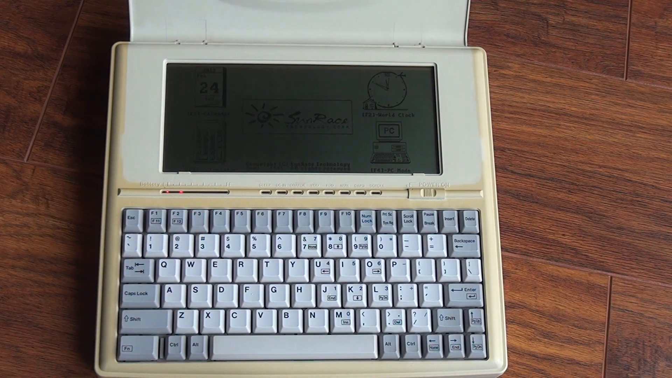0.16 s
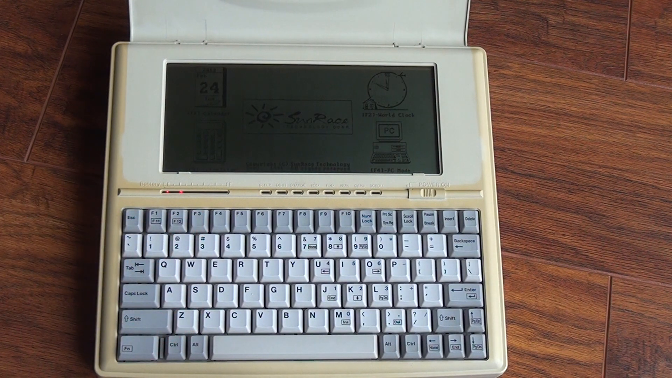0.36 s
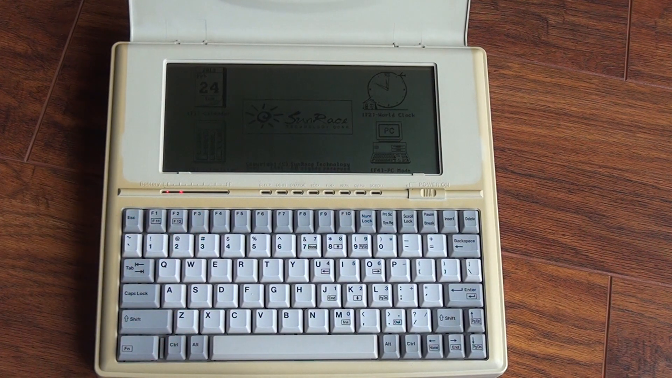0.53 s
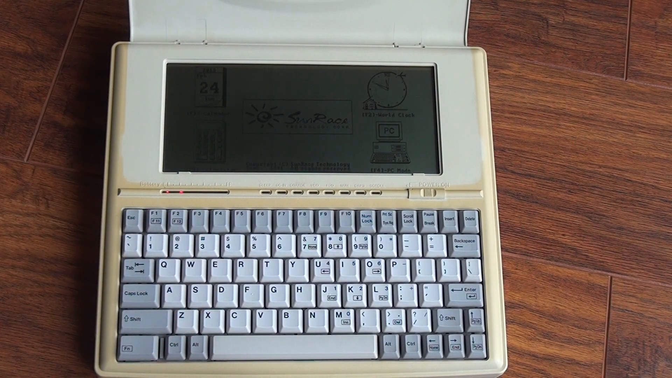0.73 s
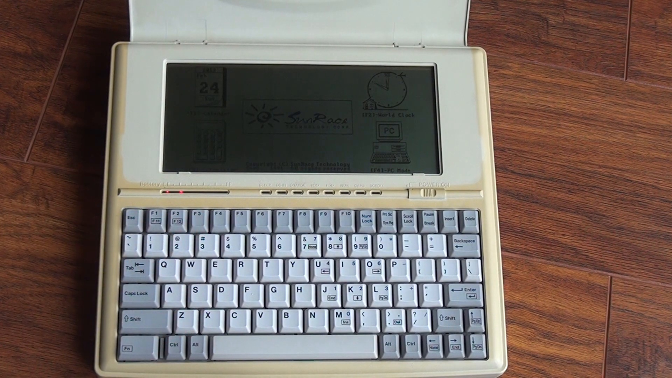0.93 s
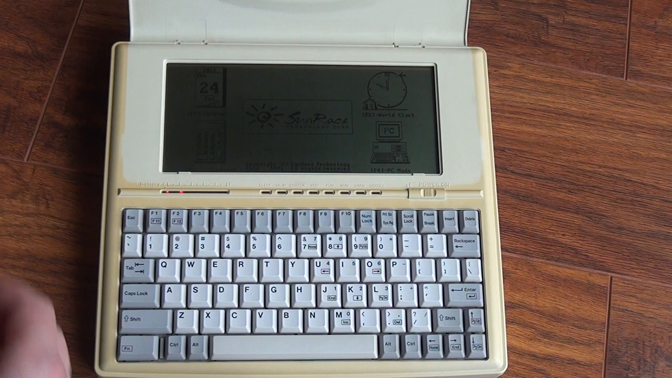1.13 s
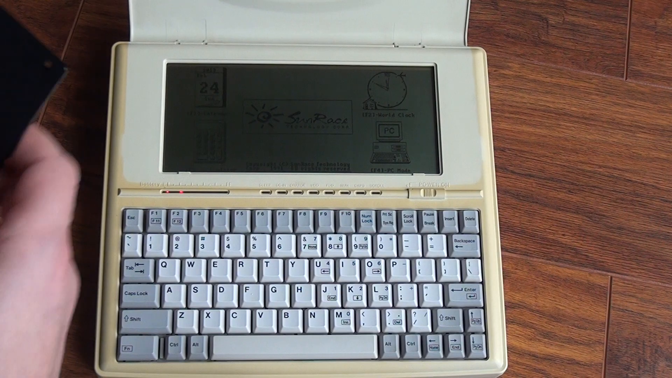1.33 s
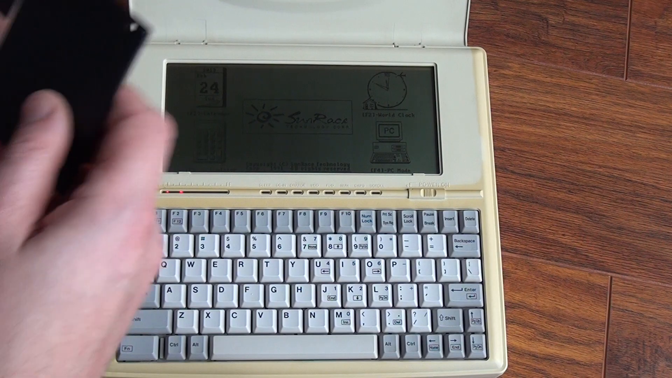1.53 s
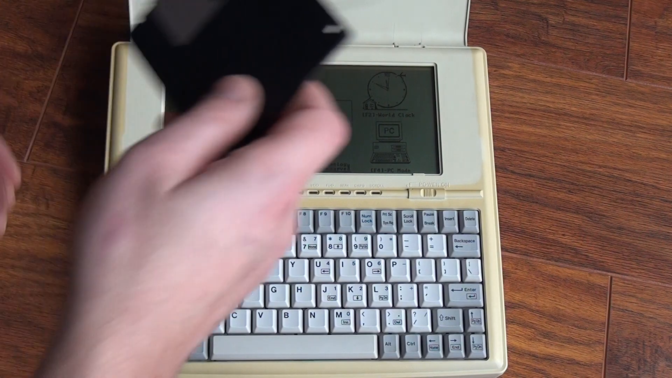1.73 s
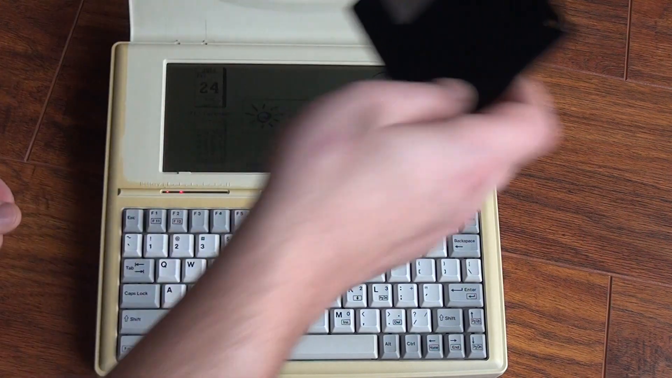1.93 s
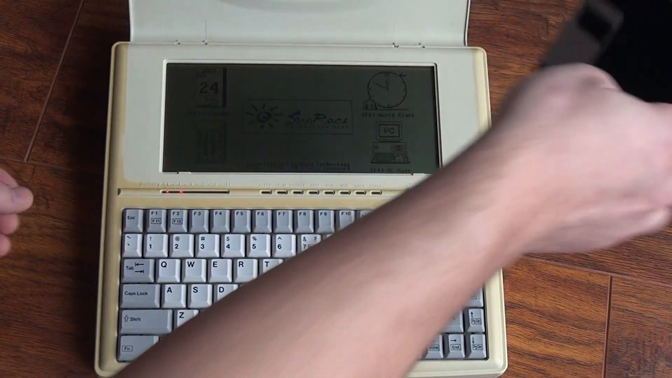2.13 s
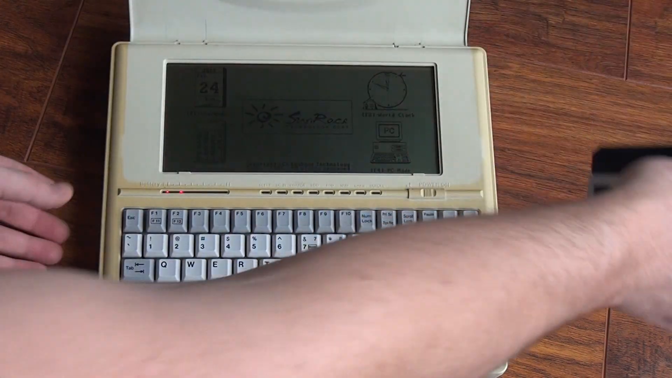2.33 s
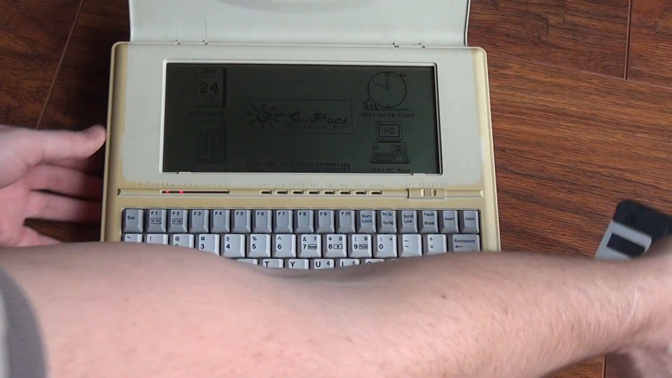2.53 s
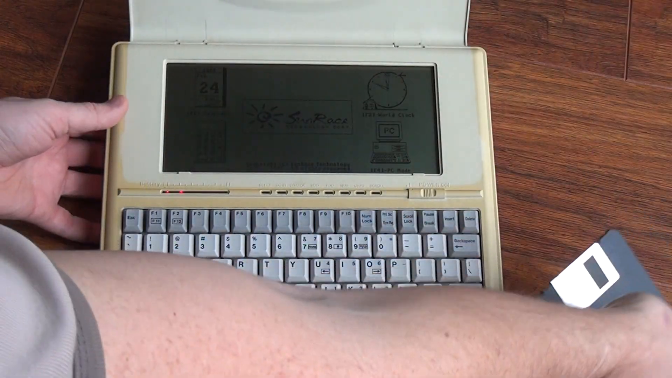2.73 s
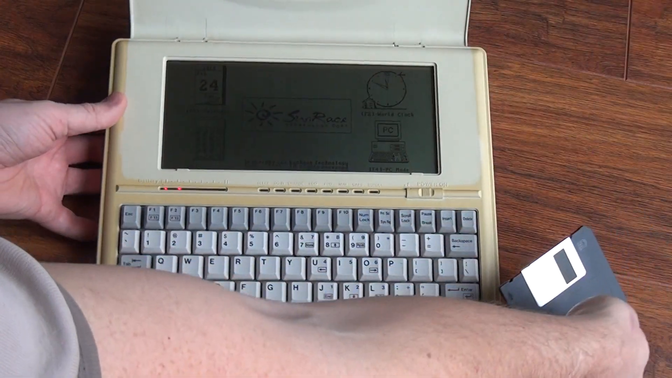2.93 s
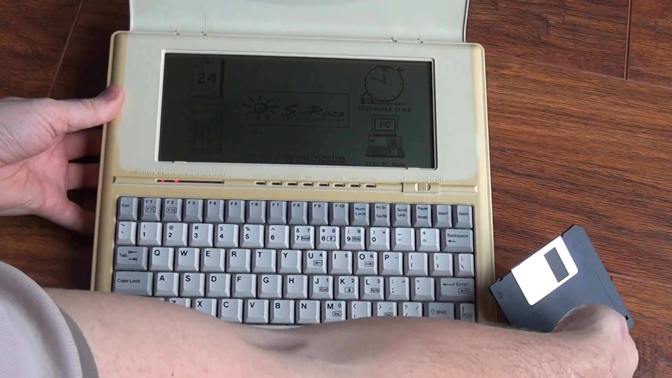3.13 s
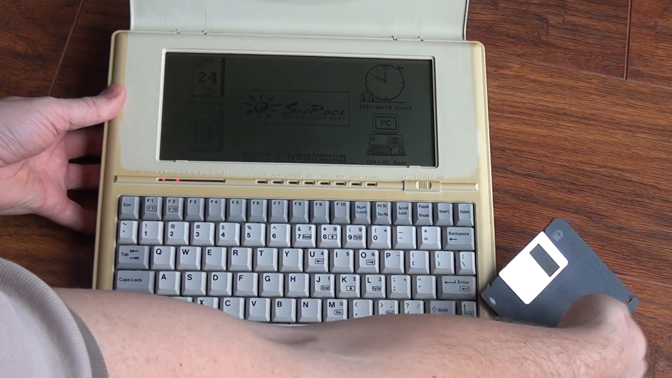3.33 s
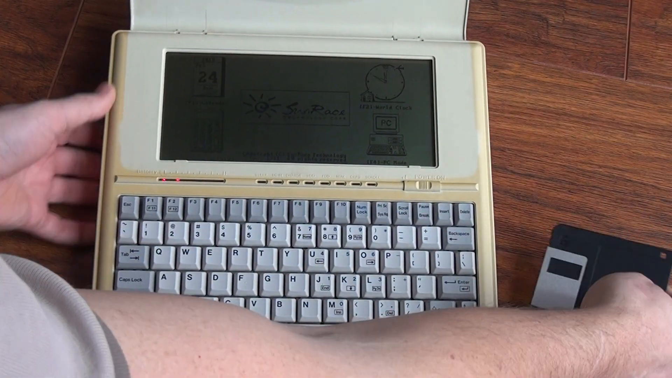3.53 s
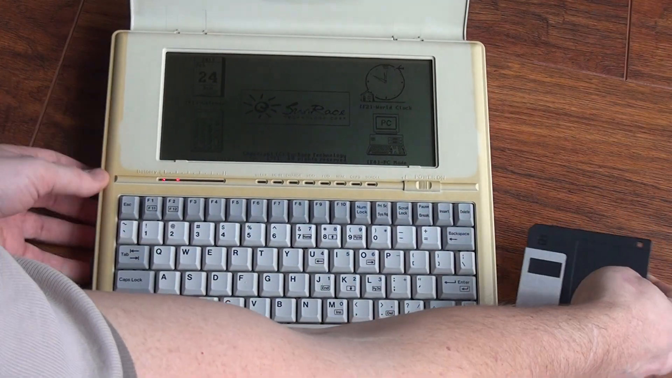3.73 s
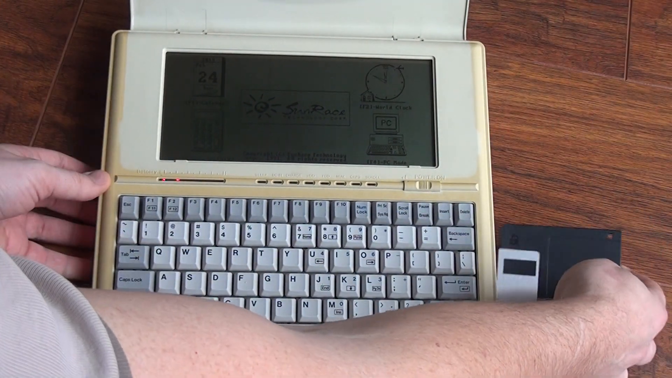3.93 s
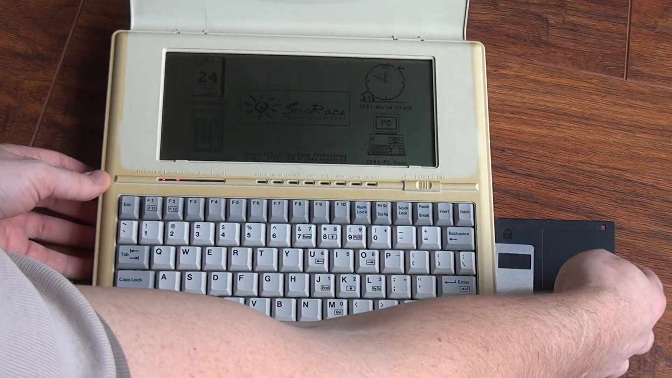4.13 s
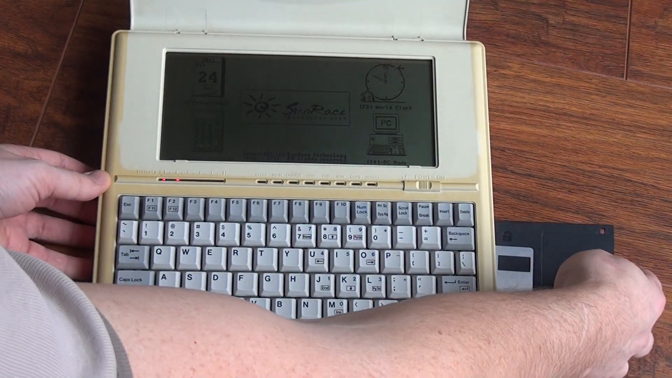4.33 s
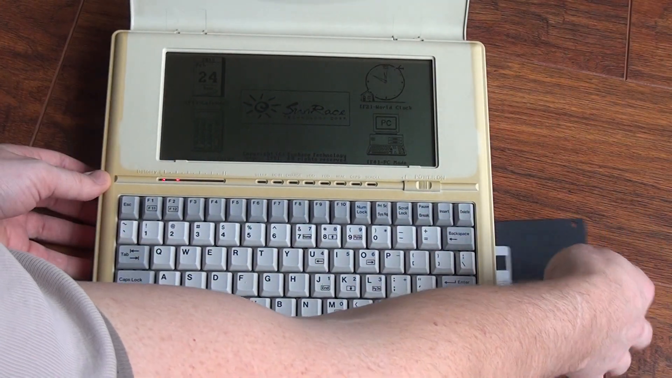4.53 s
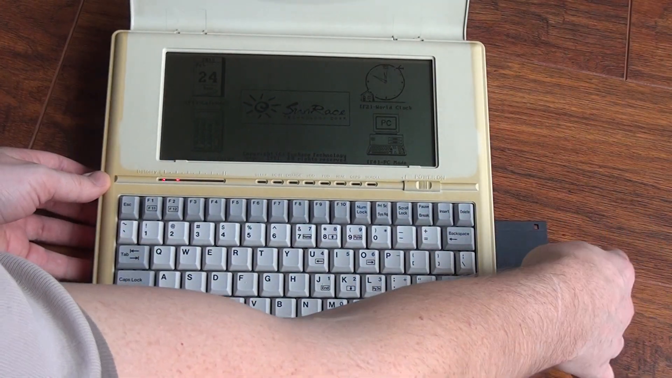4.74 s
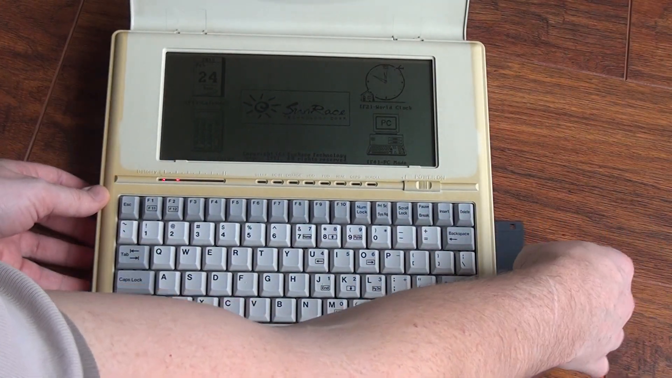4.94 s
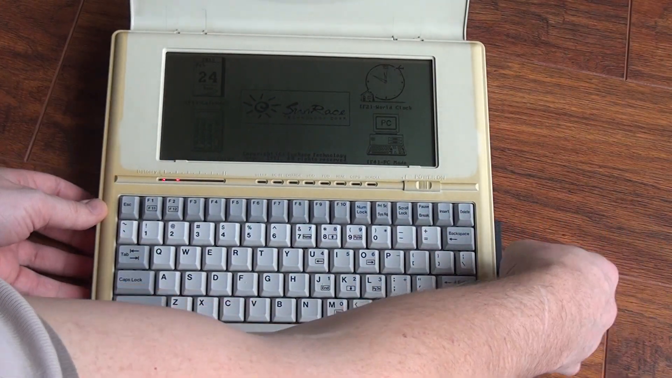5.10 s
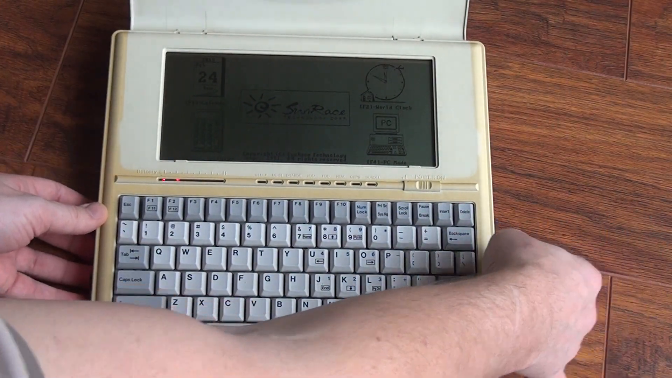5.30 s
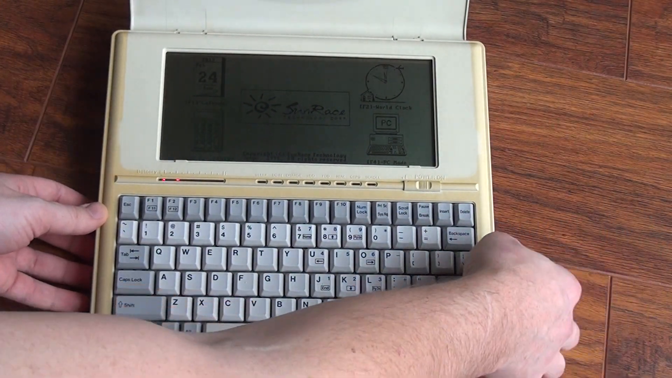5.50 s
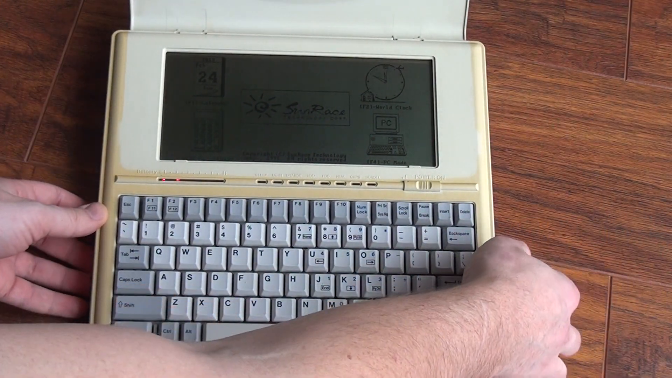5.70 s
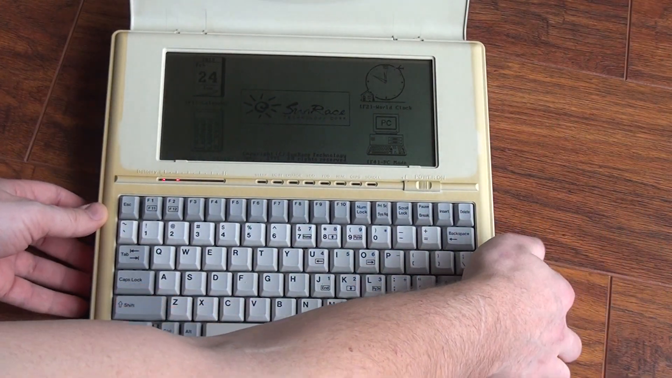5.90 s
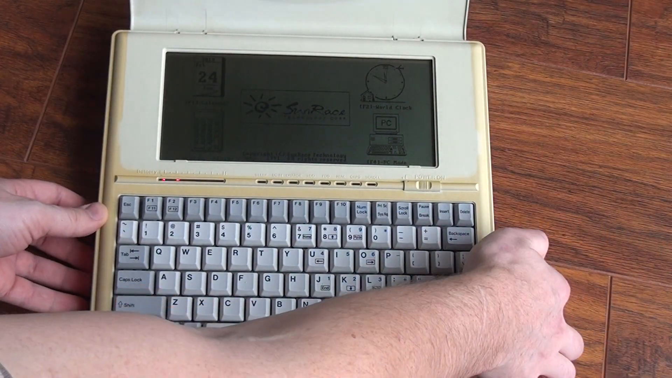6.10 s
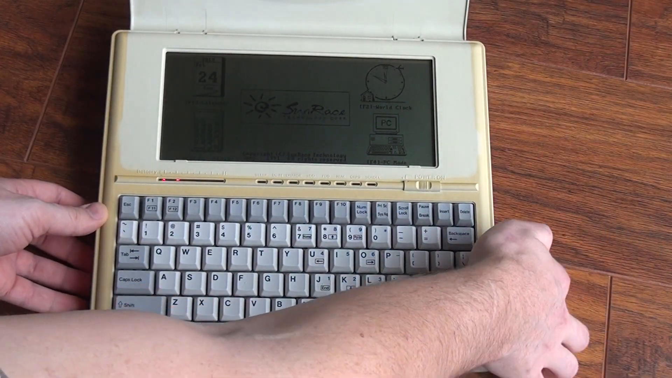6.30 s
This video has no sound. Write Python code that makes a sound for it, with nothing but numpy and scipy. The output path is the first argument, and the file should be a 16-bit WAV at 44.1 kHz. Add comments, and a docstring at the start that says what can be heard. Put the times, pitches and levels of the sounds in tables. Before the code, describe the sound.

In a quiet small room, heard from close by, a hand drags a floppy disk off the floor and turns it with soft plastic ticks while a sleeve rustles faintly. The clicks and scuffs grow busier as the disk is fed into a laptop drive. After a brief lull it locks in with a louder clack and a soft low thud, and one more click follows.

```python
"""Loading a floppy disk

A hand drags a floppy disk off a wooden floor, handles it, taps it against a laptop's drive slot and
pushes it in; the drive latches with a clack. Impact and friction excite the resonant modes of the
plastic, and the floor boards thud softly. A sleeve rustles over room air and faint electric tones.
The small, hard room reverberates after each knock."""
import sys
import numpy as np
from scipy import signal
from scipy.fft import rfft, irfft, next_fast_len
from scipy.io import wavfile
from scipy.ndimage import uniform_filter1d, map_coordinates

SR = 44100
rng = np.random.default_rng(int(sys.argv[2]) if len(sys.argv) > 2 else 0)


def file_out(sig):
    """Save sig as 16-bit WAV at sys.argv[1]."""
    # one column per channel
    cols = np.atleast_2d(sig).T
    # limit, then scale
    lim = np.clip(cols, -1, 1)
    pcm = np.round(lim * 32767).astype(np.int16)
    wavfile.write(sys.argv[1], SR, pcm)


N = 284886

# Modes of the five plastic parts, dull to bright: centre_hz, bandwidth_hz, gain_db
CASE_MODES = [(405, 110, -10.5), (537, 78, 2), (769, 197, -0.5), (950, 125, 2), (1174, 80, 0)]
SHELL_MODES = [(1300, 280, 0.5), (1740, 253, 2.5), (2133, 178, 2), (2500, 177, -3)]
EDGE_MODES = [(2850, 660, 0.5), (3310, 130, 5.5), (3500, 490, -1.5)]
SHUTTER_MODES = [(5480, 1900, 2.5), (6310, 1670, 4.5), (8860, 2300, -9.5)]
HISS_MODES = [(10800, 2200, 0), (13600, 710, 3), (15300, 2900, -9.5)]
# How readily each part sounds: gain_db. A touch's hardness favours one, from 0 (case) to 4 (hiss).
PART_DB = [0.53, -0.81, -1.05, -0.0033, 1]
# Transmission into the laptop case, weak in the air and strong in the slot: time_s, gain_db
CASE_COUPLING = [(0.5, -7), (2.2, -8), (2.6, 2.5), (4.45, 0), (4.7, -2.5), (5.05, 0.5), (5.15, 2), (6.3, 1),
                 (6.37, -7.5)]
# Knocks, ticks and scrapes: start_s, rise_s, t60_s, level_db, hardness, pitch_hz, ring_over_rattle_db
IMPACTS = [(0.555, 0.00092, 0.041, -66, 1.5, 3160, 10.5), (0.688, 0.014, 0.16, -64.5, -0.5, 3500, 12),
           (0.7212, 0.00056, 0.019, -51, 0, 3290, 7), (0.941, .001, .031, -68.5, 2.5, 2380, 6.5),
           (0.953, 0.0011, 0.032, -66, 2, 2050, 2), (1.041, 0.0011, .02, -79, 5, 5600, -10),
           (1.367, 0.00074, 0.026, -67.5, 4, 2860, 14.5), (1.374, 0.0025, 0.019, -54, 2, 2050, -22),
           (1.384, 0.031, 0.46, -73.5, 2, 3970, 8), (1.465, 0.0026, 0.02, -55.5, 3.5, 2650, 6),
           (1.475, .001, 0.013, -72, 7, 6500, 3), (1.589, 0.0022, .025, -56, 3, 1920, 8.5),
           (1.634, 0.0047, 0.035, -63.5, 2.5, 1740, -1), (2.002, 0.0022, 0.046, -59.5, 2.5, 3180, -8),
           (2.441, 0.0022, 0.044, -62, -0.5, 260, 2), (2.677, 0.00091, 0.024, -65, 1.5, 3220, -15),
           (2.52, 0.0019, 0.023, -70, -2, 328, 8), (2.702, 0.0018, 0.025, -66, -1.5, 480, 9.5),
           (2.782, 0.001, 0.014, -57.5, 2.5, 445, 12), (2.92, 0.00092, 0.086, -60, -0.4, 410, -3),
           (3.09, .0027, 0.028, -61, -2, 730, 5), (3.134, 0.0011, 0.019, -47, 0, 568, 1),
           (3.376, 0.0099, 0.08, -71.5, 1.3, 980, 3.5), (3.663, 0.0028, 0.033, -68.5, -2, 1116, 7.5),
           (3.757, 0.00068, 0.013, -65.5, 1.7, 1920, 12.5), (3.915, 0.0018, 0.04, -48.5, 0.1, 940, 8),
           (3.917, 0.003, 0.023, -56, 0.5, 3540, 12.5), (3.95, .0034, 0.18, -72, -0.5, 3755, 11),
           (4.05, 0.024, 0.35, -62.5, 0.64, 912, -12), (4.095, 0.00072, 0.065, -46, 1.95, 943, -5),
           (4.109, 0.0023, 0.08, -46.5, 1, 2010, -16), (4.269, 0.00073, 0.039, -46.5, 0.5, 820, 3.5),
           (4.4, 0.001, 0.084, -51.5, 0.37, 773, -1), (4.424, 0.002, 0.085, -56, 0.75, 2100, -10),
           (4.523, 0.0039, 0.1, -47.5, 0.6, 2076, 2), (4.571, 0.0025, 0.13, -50, 1.57, 685, -1),
           (4.602, .0033, 0.068, -39, -0.36, 953, -3.5), (4.66, 0.024, 0.15, -55.5, 0.7, 573, 4.5),
           (4.744, 0.0044, 0.045, -44, 0, 797, -3), (4.836, .001, .018, -68, 4, 3200, -13),
           (4.858, 0.0071, 0.34, -60, 0.1, 3000, 2.5), (4.87, 0.035, 0.18, -67, 2, 548, 9),
           (4.896, 0.0055, 0.052, -62.5, 2.5, 2066, 8), (4.98, 0.0026, 0.054, -51.5, -0.1, 698, 4),
           (5.004, 0.027, 0.1, -61, 1.6, 566, 7), (5.036, 0.0063, .03, -53, -4, 2030, -1),
           (5.113, 0.0059, 0.01, -39.5, 2.5, 6680, -13.5), (5.117, 0.0063, .11, -47, 1.07, 2108, 4.5),
           (5.119, 0.0029, 0.088, -54, 9, 1602, 6), (5.142, .002, 0.092, -58, -1, 775, -12),
           (5.245, 0.0046, .12, -62, 1.8, 2380, -5), (5.545, 0.0041, 0.045, -58, 1.2, 532, 6),
           (5.6, 0.0042, 0.027, -64.5, -7, 506, -4), (5.919, 0.0076, 0.1, -64, -1.2, 480, 2.5),
           (6.009, 0.0022, 0.031, -43, 0.52, 803, 1), (6.019, 0.0035, 0.029, -52, -0.5, 1555, 7.5),
           (6.153, 0.02, 0.035, -29, 1.34, 1775, -3), (6.158, 0.014, 0.045, -38.5, 4, 474, -6),
           (6.19, 0.01, 0.32, -55, 0, 2484, 14), (6.378, .0006, 0.022, -54, 1.2, 2146, 20),
           (6.392, 0.0035, 0.026, -34, 1.5, 2140, -4.5)]
# The disk sliding on floor, case and slot, then the drive's mechanism settling after the latch, one list per
# stroke: time_s, level_db, hardness
SLIDE_STROKES = [
    [(0.555, -64, 1.9), (0.601, -54.5, 1.9), (0.67, -58, 1.83), (0.74, -58.5, 1.14), (0.8, -70, 1.9),
     (0.9, -88, 3.6)],
    [(2.97, -69.5, 0.92), (3.12, -66.5, 0.99), (3.35, -92, 0.66)],
    [(4.53, -60, -1), (4.624, -61.5, 1.64), (4.734, -58, 0.7), (4.82, -70.5, 0.7), (4.936, -64.5, 1),
     (5.104, -64, 0.86), (5.25, -69, 2.5), (5.33, -80, -4)],
    [(6.22, -70, 2.1), (6.33, -56.5, 1.2), (6.46, -60, 1.4)],
]
# Fingers brushing disk and case: start_s, rise_s, t60_s, level_db, hardness
FINGER_STROKES = [(1.1, 0.052, 0.8, -70, 3), (1.591, 0.011, 0.11, -62.5, 4),
                  (1.83, 0.022, 0.29, -66.5, 2.5), (2.08, 0.045, 0.74, -68, 2),
                  (2.62, .025, 0.24, -66.5, 2.5), (2.812, .0045, 0.085, -62.5, -8),
                  (2.995, 0.024, .26, -65, 0.5), (3.222, .006, 0.074, -63, -1), (3.44, 0.025, 0.43, -71, 2),
                  (3.59, 0.019, 0.51, -68.5, 0.6), (5.859, 0.0098, 0.29, -68.5, 1.05)]
# The disk's travel from left to right: time_s, left_over_right_db
DISK_PATH = [(1.6, 2.5), (2.1, -2), (6.46, -2)]
# Weight settling on the floor boards: start_s, level_db, pitch_hz
FLOOR_THUDS = [(0.714, -78, 205), (1.583, -74.5, 162), (2.442, -77, 243), (3.085, -77, 175),
               (3.137, -76, 148), (4.6, -69, 245), (5.12, -72, 256), (6.16, -50.5, 246), (6.165, -66, 161),
               (6.2, -84, 60)]
# Sleeve and skin motion, before each band's trim: time_s, rustle_db, swish_db, rumble_db
SLEEVE_MOTION = [(0.0, -74.5, -93, -79), (0.3, -72, -93, -74), (0.92, -70.5, -78, -74),
                 (1.13, -71.5, -68.5, -76.5), (1.48, -69, -63, -75.5), (1.89, -65.5, -72, -67.5),
                 (2.03, -63, -87, -67), (2.25, -65, -68.5, -73.5), (2.81, -68.5, -76.5, -71),
                 (3.11, -72, -77, -66), (3.69, -70, -77, -75.5), (4.1, -71, -93, -70),
                 (4.62, -68, -68.5, -72), (5.25, -68.5, -75, -72), (5.4, -68, -66, -69),
                 (5.63, -70.5, -74.5, -71), (6.1, -71.5, -84, -73.5), (6.46, -72, -80, -69)]
# Relative noise spectra of the three sleeve bands and the room air: frequency_hz, density_db
RUSTLE_SPECTRUM = [(410, -47), (700, -27), (894, -18), (1020, -1), (1430, -2), (2810, -3), (6130, -7),
                   (10000, -14), (13000, -25), (22000, -120)]
SWISH_SPECTRUM = [(7000, -13), (9500, -7), (12500, -3), (15000, -18.5), (17000, -12.5)]
RUMBLE_SPECTRUM = [(35, -45), (60, -18.5), (161, -15), (301, -1), (879, -3), (1000, -5), (1300, -51),
                   (2200, -120)]
AIR_SPECTRUM = [(20, -25), (60, -15), (120, -28.5), (200, -10.5), (300, -11), (480, -25), (750, -6.5),
                (1150, -11), (1560, -0.5), (2600, -15.5), (4700, -33.5), (8500, -20.5), (13500, -11.5),
                (16600, -16)]
# Likeness of the noise at left and right: frequency_hz, correlation
STEREO_COHERENCE = [(30, 0.56), (70, 0.27), (130, 1), (1000, 0.69), (4000, 0.72), (9000, 0.77)]
# Reverberation time of the room: frequency_hz, t60_s
ROOM_DECAY = [(100, 0.38), (300, 0.6), (1000, 0.46), (4000, 0.43), (12000, 0.2)]
# Steady electric tones: pitch_hz, level_db
ELECTRIC_TONES = [(300, -89), (1550, -104), (13727, -99)]


def impacts():
    """Impact excitation: each contact is a rattle of tiny blows, and the struck panel rings."""
    blur_hz = 7530  # the higher, the purer the ring
    t = np.arange(SR // 4) / SR
    forces, rings = np.zeros((5, N + len(t))), np.zeros(N + len(t))
    chatter = rng.standard_normal((len(IMPACTS), 6, len(t)))
    for (start, rise, t60, db, hardness, hz, ring_db), noise in zip(IMPACTS, chatter):
        envelope = swell(t, rise, t60)
        first_blow = 0.73 * np.exp(-t / 0.00064 - rise / 0.012)  # strongest in an abrupt contact
        rattle = noise[:5] * envelope + first_blow * np.sign(noise[:5])
        span = slice(round(start * SR), round(start * SR) + len(t))
        forces[:, span] += part_gains(db, hardness)[:, None] * rattle
        phase_drift = hz / blur_hz * np.cumsum(noise[5])  # repeated blows shift the phase
        rings[span] += amp(db + ring_db + 3) * envelope * np.sin(2 * np.pi * hz * t + phase_drift)
    return plastic(forces[:, :N]) + filtered(rings[:N], lambda f: (f / (f - 250j)) ** 2)


def sliding_friction():
    """Sliding friction: rough surfaces drive the plastic with a dense stream of uneven grains."""
    t, gains = np.arange(N) / SR, np.zeros((5, N))
    for stroke in SLIDE_STROKES:
        inside_s = np.minimum(t - stroke[0][0], stroke[-1][0] - t)
        gate = np.clip(inside_s / .02 + .5, 0, 1)  # 20 ms fades
        gains += part_gains(*curves(stroke)) * gate
    grains = [unit(amp(1.2 * wobble(50) + 2 * wobble(500)) * rng.standard_normal(N)) for _ in gains]
    return plastic(gains * grains)


def finger_brushes():
    """Skin friction: soft swells of broadband force excite the same plastic modes."""
    t, envelopes = np.arange(SR // 2) / SR, np.zeros((5, N + SR))
    for start, rise, t60, db, hardness in FINGER_STROKES:
        stroke = part_gains(db, hardness)[:, None] * swell(t, rise, t60)
        envelopes[:, round(start * SR):][:, :len(t)] += stroke
    return plastic(envelopes[:, :N] * rng.standard_normal((5, N)))


def part_gains(db, hardness):
    """Contact hardness: a harder touch drives the smaller, brighter parts more strongly."""
    distance = np.subtract.outer(np.arange(len(PART_DB)), hardness)
    loss_db = np.where(distance > 0, 3, 2.4) * distance ** 2  # steeper toward the brighter parts
    level_db = db - loss_db + loss_db.min(axis=0)
    return amp(level_db.T + PART_DB).T


def plastic(forces):
    """Forced vibration: each of five forces drives its own part, and their sounds add."""
    parts = (CASE_MODES, SHELL_MODES, EDGE_MODES, SHUTTER_MODES, HISS_MODES)
    couplings = (amp(curves(CASE_COUPLING)[0]), 1, 1, 1, 1)
    return sum(filtered(force * coupling, lambda f: modal_response(modes, f))
               for force, coupling, modes in zip(forces, couplings, parts))


def modal_response(modes, f):
    """Modal superposition: damped resonances sum to a response of unit mean power."""
    response = sum((-1) ** k * amp(db) * 1j * f * width / (hz * hz - f * f + 1j * f * width)
                   for k, (hz, width, db) in enumerate(modes))
    low_hz, high_hz = .75 * modes[0][0], 1.6 * modes[-1][0]
    # small parts radiate little bass, damped ones little treble
    response *= (f / (f - 1j * low_hz) / (1 + 1j * f / high_hz)) ** 2
    return response / np.sqrt(np.mean(abs(response) ** 2))


def floor_thuds():
    """Damped oscillation: loaded boards give a low, blurred tone with a soft onset."""
    rise_s, t60_cycles = 0.014, 23
    t, boards = np.arange(SR // 2) / SR, np.zeros(N + SR)
    drifts = 0.029 * np.cumsum(rng.standard_normal((len(FLOOR_THUDS), len(t))), axis=1)
    for (start, db, hz), drift in zip(FLOOR_THUDS, drifts):
        tone = np.sqrt(2) * np.sin(2 * np.pi * hz * t + drift)
        boards[round(start * SR):][:len(t)] += amp(db) * swell(t, rise_s, t60_cycles / hz) * tone
    return filtered(boards[:N], lambda f: 1 / (1 + 1j * f / 600) ** 2)


def sleeve():
    """Cloth friction: three bands of noise share one random amplitude modulation."""
    rustle_db, swish_db, rumble_db = curves(SLEEVE_MOTION)
    flutter_db = .7 * wobble(14)
    rustle = amp(rustle_db - 1.5 + flutter_db) * stereo_noise(RUSTLE_SPECTRUM, patchy_db=1.2)
    swish = amp(swish_db - 7 + flutter_db) * stereo_noise(SWISH_SPECTRUM, patchy_db=1)
    rumble = amp(rumble_db - 3.5 + flutter_db) * stereo_noise(RUMBLE_SPECTRUM, patchy_db=1.5)
    return rustle + swish + rumble


def reverberation(x, width):
    """Diffuse field: each frequency decays at its own rate, in a tail drawn anew every quarter second."""
    wet, step, delay_samples = np.zeros((2, N + 2 * SR)), SR // 4, 250
    for at in range(0, N, step):
        hz, t, spectra = signal.stft(rng.standard_normal((2, SR // 2)), SR, nperseg=256)
        spread = np.array([np.ones_like(hz), width * hz / (hz + 2500)])[..., None]
        decay = amp(-60 * t / along(ROOM_DECAY, hz)[:, None])
        mid, side = signal.istft(spectra * spread * decay, SR, nperseg=256)[1]
        tail = left_right(mid, side) / np.linalg.norm(mid)
        echoes = signal.fftconvolve(x[None, at:at + step], tail, axes=1)
        wet[:, at + delay_samples:][:, :echoes.shape[1]] += echoes
    return wet[:, :N]


def background():
    """Noise floor: room air and hiss, with electric tones that waver in level and phase."""
    t = np.arange(N) / SR
    tones = sum(amp(db + 1.2 * wobble(8)) * np.sqrt(2) * np.sin(2 * np.pi * hz * t + wobble(10))
                for hz, db in ELECTRIC_TONES)
    return amp(-74.5) * stereo_noise(AIR_SPECTRUM, patchy_db=.7) + tones


def stereo_noise(spectrum, patchy_db):
    """Partial coherence: two related noises of unit rms, their gain patchy in time and frequency."""
    def mid_side_gains(hz):
        angle = np.arccos(np.clip(along(STEREO_COHERENCE, hz), -1, 1)) / 2
        return amp(along(spectrum, hz)) * [np.cos(angle), np.sin(angle)]
    spectra = signal.stft(rng.standard_normal((2, N)), nperseg=512)[2]
    patches = uniform_filter1d(uniform_filter1d(rng.standard_normal(spectra.shape[1:]), 6, 0), 10, 1)
    pair = signal.istft(spectra * amp(patchy_db * unit(patches)), nperseg=512)[1][:, :N]
    return unit(left_right(*filtered(pair, mid_side_gains)))


def swell(t, rise, t60):
    """Exponential decay after a rise to 1."""
    return np.minimum(t / rise, 1) ** 1.2 * amp(-60 * np.maximum(t - rise, 0) / t60)


def amp(db):
    """Decibels as an amplitude ratio."""
    return 10 ** (np.asarray(db) / 20)


def unit(x):
    """Normalisation to unit rms."""
    return x / np.sqrt(np.mean(x ** 2) + 1e-20)


def along(points, hz):
    """Interpolation on a logarithmic frequency axis."""
    frequencies, values = np.transpose(points)
    return np.interp(np.log(hz + 1), np.log(frequencies + 1), values)


def curves(rows):
    """Linear interpolation in time of each column after the first."""
    times, *columns = np.transpose(rows)
    return np.array([np.interp(np.arange(N) / SR, times, column) for column in columns])


def wobble(rate):
    """Smooth random modulation, with rate knots a second."""
    return map_coordinates(rng.standard_normal(int(N * rate / SR) + 4), [np.arange(N) * rate / SR])


def filtered(x, response):
    """Linear filtering: the spectrum is multiplied by a complex frequency response."""
    size = next_fast_len(N + SR // 2)
    return irfft(rfft(x, size) * response(np.fft.rfftfreq(size, 1 / SR)), size)[..., :N]


def left_right(mid, side):
    """Sum-and-difference stereo."""
    return np.array([mid + side, mid - side])


def scene():
    """Superposition: the plastic's direct sound and reverberation, plus floor, sleeve and air."""
    direct = impacts() + sliding_friction() + finger_brushes()
    pan = np.tanh(curves(DISK_PATH)[0] * np.log(10) / 40)
    side = filtered(direct * pan, lambda hz: hz / (hz - 600j))  # only short waves tell left from right
    room = amp(-7) * reverberation(direct, width=0.62)
    return left_right(direct, side) + room + floor_thuds() + sleeve() + background()


def record(dry):
    """Band limiting: the high treble is nearly mono, and nothing passes above the cutoff."""
    narrow_above_hz, cutoff_hz = 11200, 16540
    mid = (dry[0] + dry[1]) / 2
    side = filtered((dry[0] - dry[1]) / 2, lambda hz: np.where(hz < narrow_above_hz, 1, amp(-20)))
    return filtered(left_right(mid, side), lambda hz: hz < cutoff_hz)


dry = scene()
out = record(dry)
file_out(out)
```